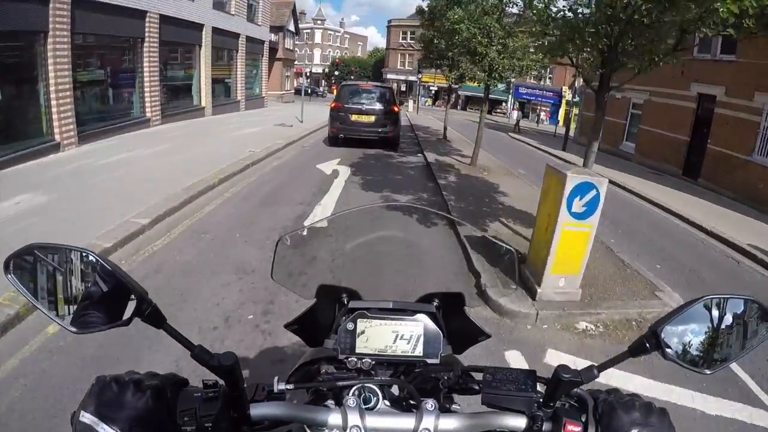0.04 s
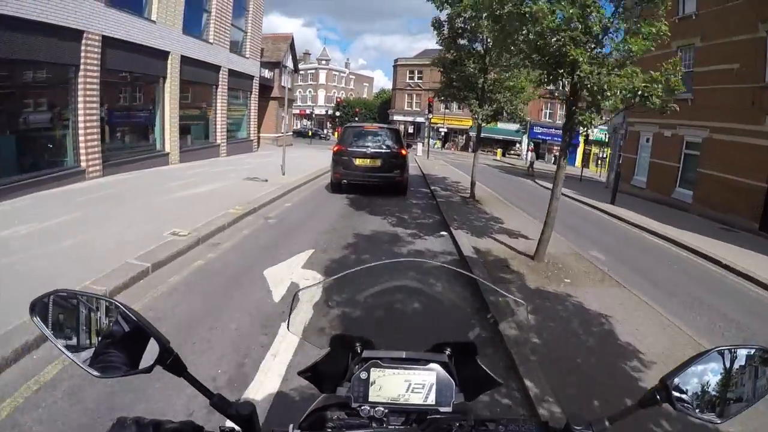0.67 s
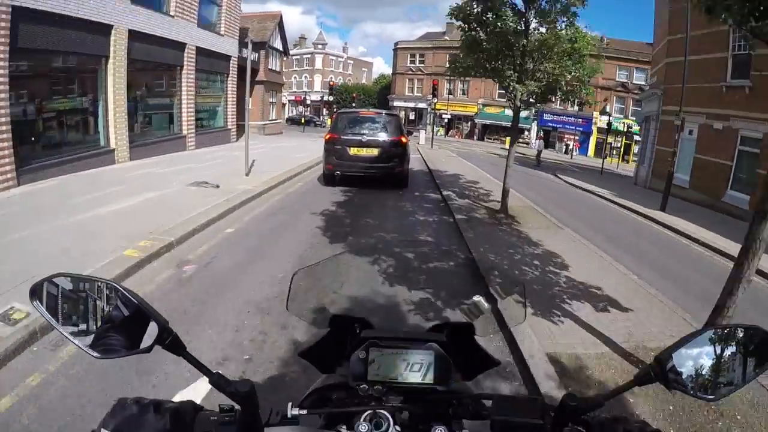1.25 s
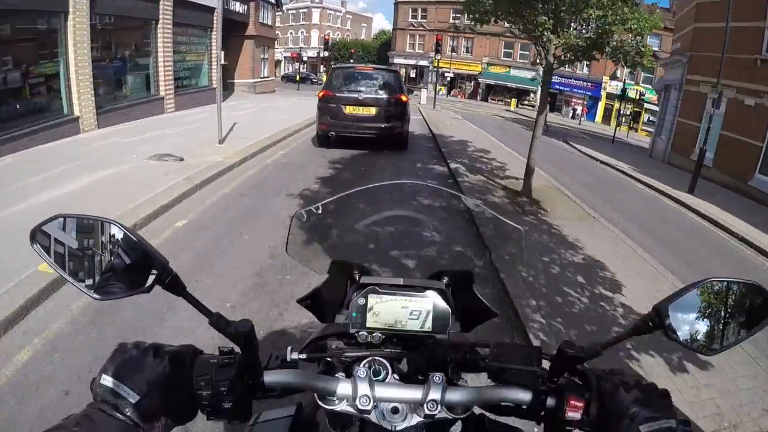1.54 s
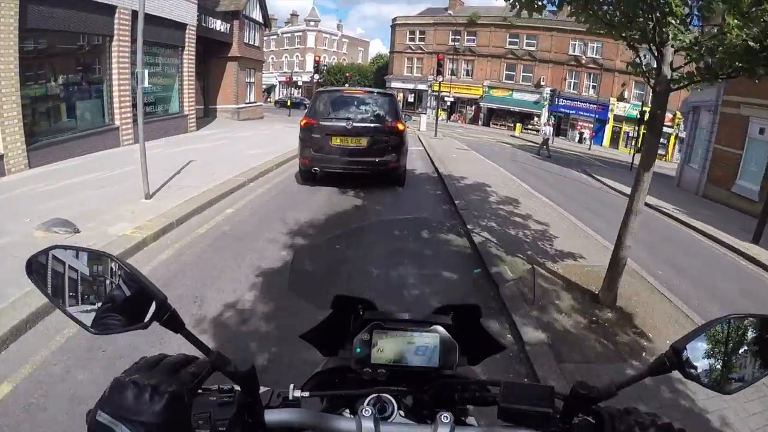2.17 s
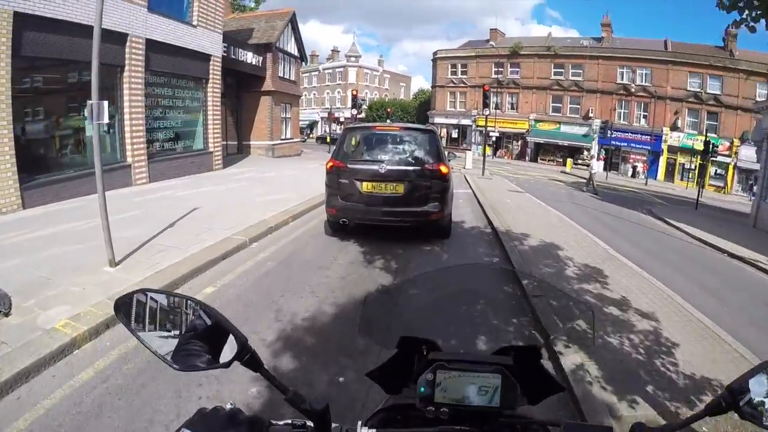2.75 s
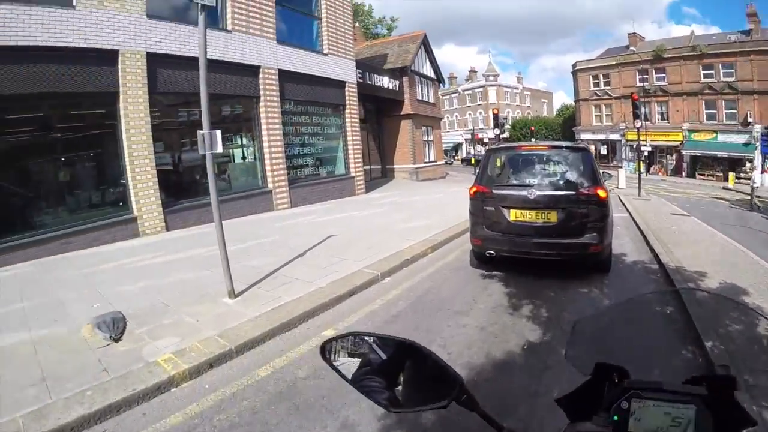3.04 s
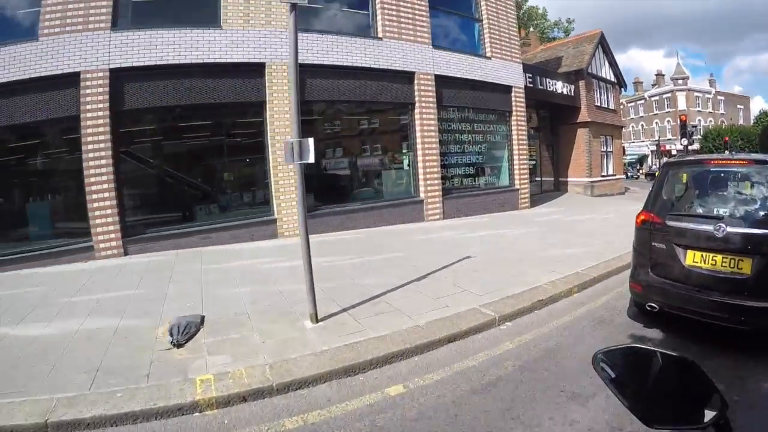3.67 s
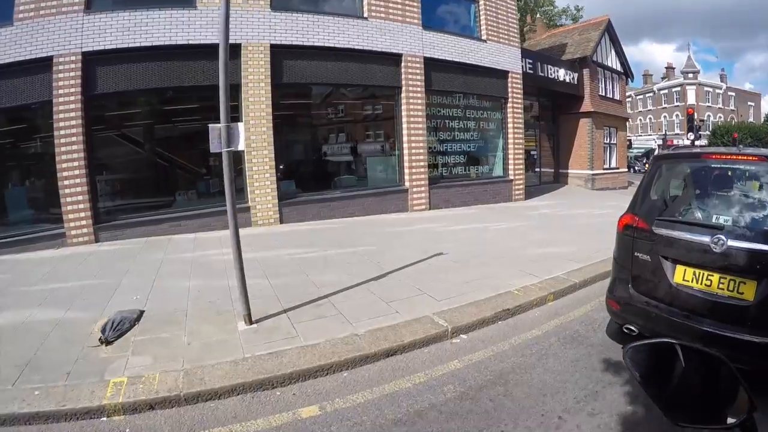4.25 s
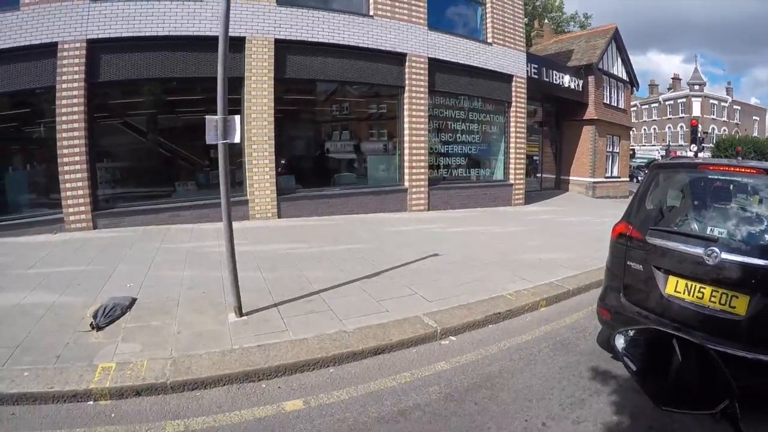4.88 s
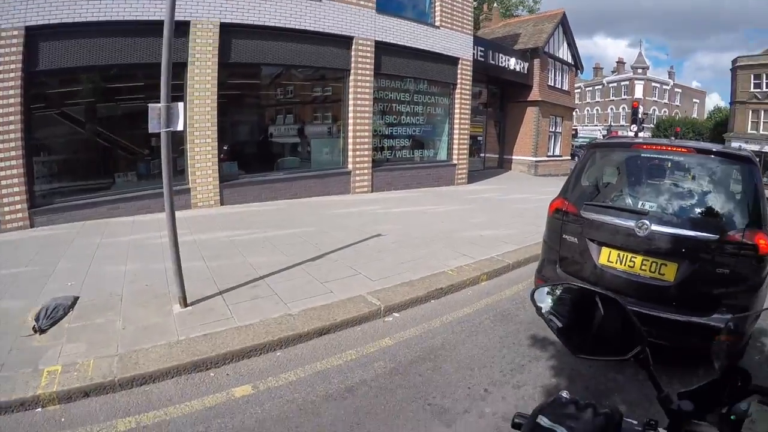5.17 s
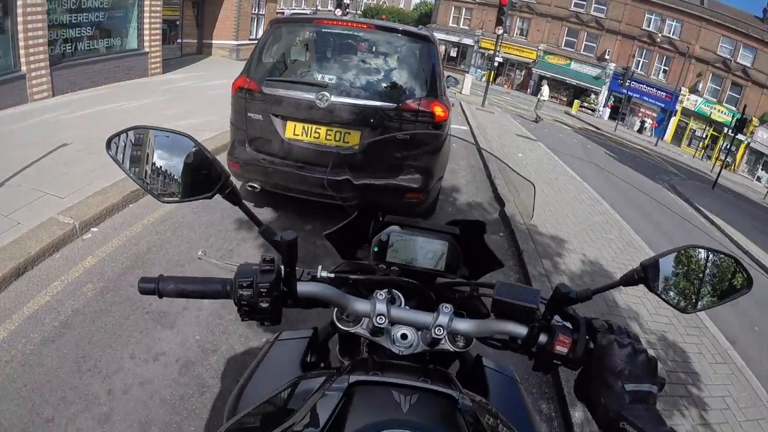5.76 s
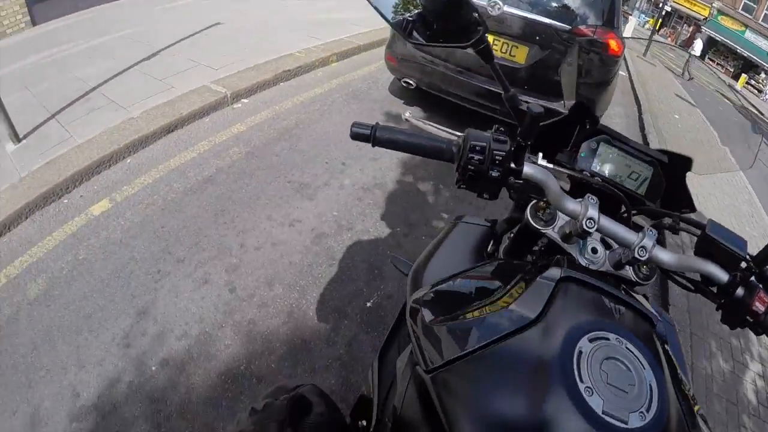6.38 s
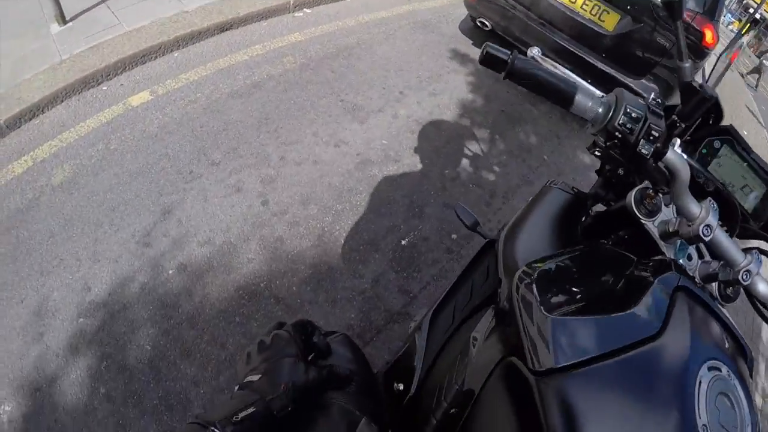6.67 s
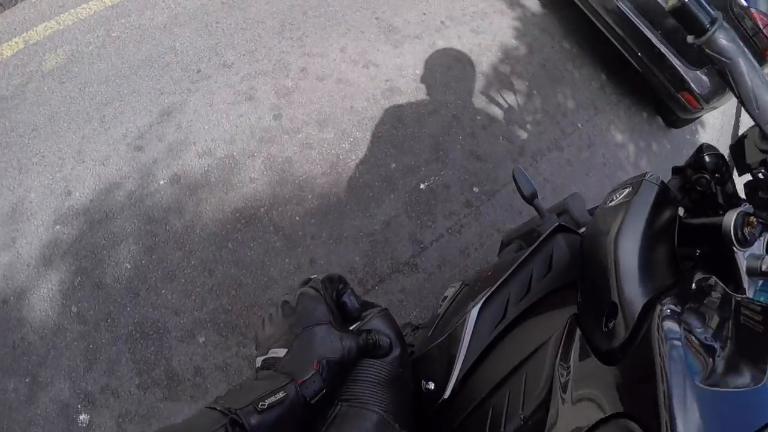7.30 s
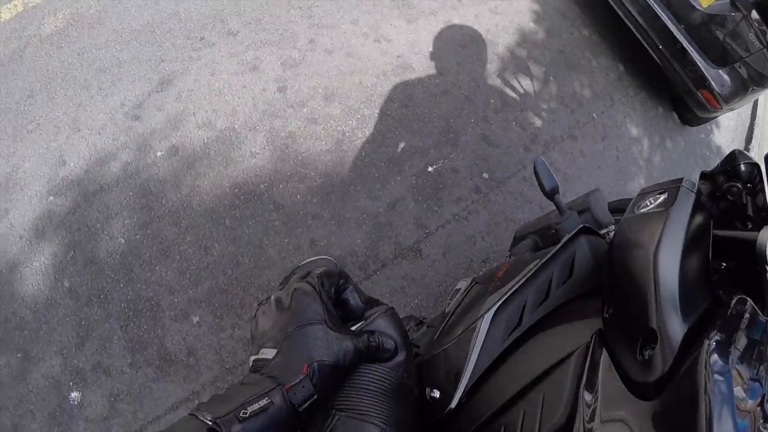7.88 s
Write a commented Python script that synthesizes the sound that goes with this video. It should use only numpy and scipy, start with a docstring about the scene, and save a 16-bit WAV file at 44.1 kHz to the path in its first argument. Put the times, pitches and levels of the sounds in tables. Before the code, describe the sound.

Heard from the rider's helmet, a twin-cylinder motorcycle slows to a steady, throbbing idle, with a few short knocks on the microphone.

```python
"""Motorcycle stopping in town

A 270-degree parallel twin rolls to a stop and idles, heard close up from a stereo camera on the helmet.
Uneven exhaust and intake pulses ring the pipe and airbox; gears clatter and valves tick with the crank.
The balance shifts as the rider pulls the clutch, looks left, looks down and bends over. Wind fades,
a traffic hum beats with the exhaust, clothing rustles and the camera mount knocks a few times."""
import sys
import numpy as np
from scipy import signal
from scipy.fft import rfft, irfft, next_fast_len
from scipy.io import wavfile
from scipy.ndimage import uniform_filter1d, minimum_filter1d

SR = 44100
rng = np.random.default_rng(int(sys.argv[2]) if len(sys.argv) > 2 else 0)


def generate_wav(signal):
    """Clip the signal to [-1, 1] and save it as 16-bit WAV at the path in sys.argv[1]."""
    frames = np.transpose(np.atleast_2d(signal))
    scaled = np.clip(frames, -1, 1) * 32767
    pcm = np.round(scaled).astype(np.int16)
    wavfile.write(sys.argv[1], SR, pcm)


N = 358691
T = np.arange(N) / SR
SIZE = next_fast_len(N)
FREQ = np.maximum(np.arange(SIZE // 2 + 1) * SR / SIZE, 1e-3)
STOP_S = 3.6


def undb(db):
    """Decibels to gain."""
    return 10 ** (np.asarray(db) / 20)


def unit(x):
    """Scale to an rms of one."""
    return x / np.sqrt(np.mean(x ** 2))


def curve(table):
    """A table of times and values, drawn out to one value a sample."""
    return np.interp(T, *np.transpose(table))


def filtered(x, response):
    """Pass a sound through a frequency response."""
    return irfft(rfft(x, SIZE) * response, SIZE)[..., :N]


def resonance(hz, width_hz):
    """Response of one damped mode, gain 1 at its centre."""
    return 1 / (1 + 1j * (FREQ ** 2 - hz ** 2) / (FREQ * width_hz))


def colour(x, spectrum):
    """Give a sound a smooth spectrum and an rms of one."""
    hz, db = np.transpose(spectrum)
    return unit(filtered(x, undb(np.interp(np.log(FREQ), np.log(hz), db, left=-70, right=-70))))


def wander(rate_hz):
    """Smooth random drift with an rms of one."""
    step = int(SR / rate_hz)
    return unit(uniform_filter1d(np.repeat(rng.standard_normal(N // step + 1), step), step)[:N])


def stereo(mid, side, side_db, pan_db):
    """Left and right microphone ports from a shared and an opposed part; positive pan is left."""
    sign = np.array([[1], [-1]])
    return (mid + sign * side * undb(side_db)) * undb(sign * pan_db / 2)


# Crank speed, sinking to a slightly hunting idle: time_s, speed_rpm
ENGINE_SPEED = [(0.0, 1586), (0.28, 1378), (0.6, 1345), (0.86, 1404), (1.44, 1354), (2.58, 1356),
                (2.82, 1386), (3.26, 1323), (3.36, 1357), (5.44, 1354), (5.72, 1332), (6.12, 1364),
                (6.42, 1317), (6.7, 1376), (8.13, 1290)]

def engine_cycles():
    """Running count of four-stroke cycles, one for two turns of the crank."""
    return np.cumsum(curve(ENGINE_SPEED)) / (2 * 60 * SR)


def move(start_s, end_s):
    """Progress of one of the rider's moves, from 0 to 1."""
    return np.interp(T, (start_s, end_s), (0, 1))


def pose():
    """How far the rider looks left, looks down and bends over, carrying the microphone along."""
    down = move(4.85, 6.7)
    left = move(2.74, 3.46) * (1 - down)
    bent = move(6.65, 7.33)
    return left, down, bent


def at_helmet_db(balance, idle_rpm=1355, raised_rpm=1590):
    """A part's level at idle facing ahead, plus what revs, clutch and pose add to it."""
    idle_db, revs_db, in_gear_db, left_db, down_db, bent_db = balance
    revs = (curve(ENGINE_SPEED) - idle_rpm) / (raised_rpm - idle_rpm)
    in_gear = 1 - move(.5, .8)  # the rider pulls the clutch
    left, down, bent = pose()
    return (idle_db + revs * revs_db + in_gear * in_gear_db
            + left * left_db + down * down_db + bent * bent_db)


def strokes(cycle, phase, scatter_db, jitter_s):
    """One pulse a cycle at a crank position, each a little different in size and time."""
    due = np.arange(int(cycle[-1]) + 1) + phase % 1
    chance = rng.standard_normal((len(due), 2))
    at = (np.interp(due, cycle, T, right=np.inf) + jitter_s * chance[:, 0]) * SR
    inside = (at >= 0) & (at < N)
    return np.bincount(at[inside].astype(int), undb(scatter_db * chance[inside, 1]), N)


def boom_swell(peak_s=.521, period_s=.4366):
    """The boom comes and goes while the bike rolls and holds steady once it stands."""
    depth = np.clip(.8 * (1 - T / STOP_S), 0, 1)
    return 1 + depth * np.cos(2 * np.pi * (T - peak_s) / period_s)


# Resonances of the pipe and airbox, below the rider: pitch_hz, width_hz, gain_db, polarity
PIPE_MODES = [(58.2, 33.7, -2, -1), (110.7, 5.8, -2, -1), (152.7, 20.4, 1, -1), (274.8, 18, -13, -1)]
AIRBOX_MODES = [(49.6, 11.4, 3.9, -1), (89.1, 10.4, -8, -1), (163.4, 34.4, 3, 1), (179.3, 8.9, 1.5, -1),
                (232, 5.9, -4, -1)]
# Their thud, boom and bark at the helmet: idle_db, revs_db, in_gear_db, left_db, down_db, bent_db
THUD_BALANCE = (-12.5, -4.5, -1.2, -.5, .1, -1.5)
BOOM_BALANCE = (-21, -11, -1, -0.75, 2.5, 2)
BARK_BALANCE = (-25.5, -13, -2, 1, 0.5, -14)

def exhaust_and_intake(cycle):
    """Two cylinders fire 270 degrees apart; each blows into the pipe, then gulps from the airbox."""
    first, apart, intake_lag = .955, .372, .224  # shares of a cycle
    gas = 0
    for modes, lag in ((PIPE_MODES, 0), (AIRBOX_MODES, intake_lag)):
        pulses = sum(strokes(cycle, first + lag + phase, scatter_db=.75, jitter_s=.00021)
                     for phase in (0, apart))
        cavity = sum(sign * undb(db) * resonance(hz, width) for hz, width, db, sign in modes)
        gas = gas + filtered(pulses, cavity)
    # the silencer damps the top, and small openings radiate little deep bass
    muffle_hz, opening_hz = 300, 45
    high, low = 1j * FREQ / muffle_hz, 1j * FREQ / opening_hz
    radiation = low ** 2 / (low ** 2 + low + 1)
    gas = unit(filtered(gas, radiation / (high ** 2 + np.sqrt(2) * high + 1)))
    boom_band = 1 / (1 + ((FREQ - 180) / 9) ** 4)
    bark_band = (1 - boom_band) / (1 + (200 / FREQ) ** 24)
    thud = filtered(gas, 1 - boom_band - bark_band)
    bark = unit(filtered(gas, bark_band / (1 + (FREQ / 318) ** 12)))
    # the silencer singles out the 16th multiple of the cycle as a firm boom near 180 Hz
    harmonic = np.exp(2j * np.pi * 16 * cycle)
    boom = unit(np.real(harmonic * np.mean(gas / harmonic)))
    return (thud * undb(at_helmet_db(THUD_BALANCE))
            + boom * undb(at_helmet_db(BOOM_BALANCE)) * boom_swell()
            + bark * undb(at_helmet_db(BARK_BALANCE)))


def rattle(cycle, repeat):
    """Dense metal contacts; a share of them comes back on every engine cycle."""
    one_cycle = rng.standard_normal(int(N / cycle[-1]))
    recurring = one_cycle[(cycle % 1 * len(one_cycle)).astype(int)]
    return np.sqrt(repeat) * recurring + np.sqrt(1 - repeat) * rng.standard_normal(N)


# Clatter from the crankcase, down by the rider's feet: frequency_hz, gain_db
GEAR_SPECTRUM = [(200, 13), (340, -1), (430, 1), (530, -11.5), (640, -2), (700, -5.5), (780, 2), (860, -3),
                 (1200, -3.5), (1450, -8.5), (1750, -9), (2400, -48)]
# That clatter at the helmet: idle_db, revs_db, in_gear_db, left_db, down_db, bent_db
GEAR_BALANCE = (-27, 2, 1.5, -1.06, -0.7, 1.05)

def gears(cycle):
    """Primary gears and clutch clatter in the crankcase."""
    grain = undb(1.25 * wander(260) + .5 * wander(35))
    mid, side = (colour(rattle(cycle, repeat=.53) * grain, GEAR_SPECTRUM) for _ in range(2))
    # the side of the case that faces the helmet lends its own pitch
    ahead_hz, left_hz, down_hz = 1287, 880, 1000
    left, down, _ = pose()
    centre_hz = (1 - left - down) * ahead_hz + left * left_hz + down * down_hz
    case = 0
    for hz in (785, 970, 1160):
        facing = np.exp(-(np.log(centre_hz / hz) / .16) ** 2)
        case = case + facing * unit(filtered(mid, resonance(hz, 150)))
    clatter = unit(mid + undb(-10.5) * case)
    return stereo(clatter, side, side_db=-20.5, pan_db=0) * undb(at_helmet_db(GEAR_BALANCE))


# Valves closing: phase_cycles, gain_db
VALVE_TAPS = [(.185, 6), (.54, -10), (0.896, -6.5)]
# Cam chain and high hiss from the cylinder head: frequency_hz, gain_db
CHAIN_SPECTRUM = [(1200, -16), (1650, -6.5), (2000, 4.5), (2300, -5), (2600, -6), (2900, -1), (3080, 0.5),
                  (3260, -4.5), (4400, -13), (5100, -10), (6200, -17), (9000, -33)]
HISS_SPECTRUM = [(2500, 2), (4500, -8), (6100, -4.5), (7500, 0.5), (10000, -2.5), (11300, -6), (12500, -12),
                 (15000, -16)]
# Chain, cover and hiss at the helmet, and the ticks' strength within the hiss:
# idle_db, revs_db, in_gear_db, left_db, down_db, bent_db
CHAIN_BALANCE = (-39.5, 3.5, 2.5, -0.84, -0.4, 0.2)
COVER_BALANCE = (-42.5, 2.5, .5, -4.5, 2, -2.5)
HISS_BALANCE = (-50.5, 2, 1.7, 1.5, -1.5, 0.5)
TICK_BALANCE = (-6.5, -5, 3, 3, -1, 8.5)

def cylinder_head(cycle, fade_s=.0052):
    """The cam chain rustles steadily; closing valves add short bright bursts and ring the cam cover."""
    taps = sum(undb(db) * strokes(cycle, phase, scatter_db=2.5, jitter_s=.00039)
               for phase, db in VALVE_TAPS)
    decays = signal.lfilter([1], [1, -np.exp(-1 / (fade_s * SR))], taps)
    burst = uniform_filter1d(decays, size=60)
    grain = undb(wander(400))
    chain = [colour(rattle(cycle, repeat=.35) * grain * (1 + .34 * burst), CHAIN_SPECTRUM)
             for _ in range(2)]
    # the cover answers each tap with a ping, and hums with the rattle between taps
    ping = unit(filtered(taps, resonance(2204, 130) ** 2))
    hum, hum_side = (unit(filtered(rattle(cycle, repeat=.49), resonance(2149, 320) ** 2))
                     for _ in range(2))
    cover = unit(hum + undb(-3.5) * ping)
    ticking = 1 + undb(at_helmet_db(TICK_BALANCE)) * burst
    hiss = [colour(rng.standard_normal(N) * grain * ticking, HISS_SPECTRUM) for _ in range(2)]
    return (stereo(*chain, side_db=-8.5, pan_db=.8) * undb(at_helmet_db(CHAIN_BALANCE))
            + stereo(cover, hum_side, side_db=-26, pan_db=2.5) * undb(at_helmet_db(COVER_BALANCE))
            + stereo(*hiss, side_db=-1, pan_db=-1) * undb(at_helmet_db(HISS_BALANCE)))


# Low buffeting right at the microphone: frequency_hz, gain_db
WIND_SPECTRUM = [(8, -13), (27, -3), (55, -1), (120, -11), (300, -21), (1000, -61)]
# The buffeting dying away as the bike slows: time_s, level_db
WIND_FADE = [(0, -15.5), (.9, -26.5), (1.6, -29.5), (8, -38)]

def wind():
    """Wind buffets the helmet while the bike rolls, then only the low rumble of the street is left."""
    mid, side = (colour(rng.standard_normal(N), WIND_SPECTRUM) for _ in range(2))
    gusts_db = 1.9 * wander(3.97)
    return stereo(mid, side, side_db=-24.5, pan_db=-1) * undb(curve(WIND_FADE) + gusts_db)


def traffic_hum(pitch_hz=175.76, near_db=-27):
    """Waiting traffic hums, louder as the bike draws up, close enough in pitch to beat with the boom."""
    nearness = np.interp(T, [0, STOP_S], [.4, 1])
    hum = unit(np.sin(2 * np.pi * pitch_hz * T + 1.2 * wander(5.3)))
    return hum * undb(near_db) * nearness


# Jacket and straps, just below the microphone:
# peak_s, length_s, centre_hz, width_hz, level_db, pan_db
CLOTHING_RUSTLES = [(.175, 0.014, 11700, 1500, -55, -1), (0.508, 0.094, 8850, 4000, -47, -3),
                    (5.11, .05, 11400, 1200, -50, -7), (5.245, 0.074, 11100, 1200, -48, -8),
                    (5.453, 0.0034, 10000, 6000, -44, -3), (5.477, .04, 7950, 1600, -44, -5),
                    (6.46, .004, 13000, 3000, -46, 1), (6.554, 0.0044, 14000, 2000, -41, -6.5)]

def clothing():
    """Stiff fabric gives brief swishes and ticks."""
    out = np.zeros((2, N))
    cloth = rng.standard_normal((2, N))
    for peak_s, length_s, hz, width, db, pan_db in CLOTHING_RUSTLES:
        swell = np.exp(-2 * ((T - peak_s) / length_s) ** 2)
        swish = filtered(cloth, resonance(hz, width) ** 2)
        out += undb(db) * swell * unit(stereo(*swish, side_db=4.5, pan_db=pan_db))
    return out


# Resonances of the camera mount: pitch_hz, width_hz, gain_db
MOUNT_MODES = [(264, 30, 17), (396, 29, 14), (590, 230, 1.5), (1030, 280, 7.5), (1350, 220, -10),
               (2110, 850, -5), (2890, 170, 0), (3790, 700, -8), (4870, 530, -8), (7700, 2500, -2)]
# Knocks on the mount, ahead of the camera's limiter: start_s, peak_db, cutoff_hz
MOUNT_KNOCKS = [(3.0664, -6.5, 1680), (5.3583, -6, 1400), (7.5072, -11, 1720), (7.5871, 4.5, 4540)]

def mount_knocks(chatter_s=.0043):
    """Short blows ring the plastic camera mount; harder contacts reach the upper modes."""
    out = np.zeros((2, N))
    mount = sum(undb(db) * resonance(hz, width) for hz, width, db in MOUNT_MODES)
    for start_s, peak_db, cutoff_hz in MOUNT_KNOCKS:
        age = T - start_s
        # one blow, followed by a brief chatter of the joint
        chatter = stereo(*rng.standard_normal((2, N)), side_db=-12, pan_db=-9.5)
        force = (age >= 0) * np.exp(-np.abs(age) / chatter_s) * chatter * .056
        force[:, int(start_s * SR)] -= 1
        ring = filtered(force, mount / (1 + 1j * FREQ / cutoff_hz) ** 2)
        out += undb(peak_db) * ring / np.abs(ring).max()
    return out


def scene():
    """The crank drives every engine layer; wind, traffic and the rider's kit add the rest."""
    cycle = engine_cycles()
    engine = exhaust_and_intake(cycle) + gears(cycle) + cylinder_head(cycle)
    return engine + wind() + traffic_hum() + mount_knocks() + clothing()


def record(dry):
    """Sound reaches the right port a moment later; the camera limits the peaks and cuts the top."""
    port_lag_s, ceiling, top_hz = 5.6e-5, .86, 15500
    ports = np.array([dry[0], filtered(dry[1], np.exp(-2j * np.pi * FREQ * port_lag_s))])
    safe_gain = np.minimum(1, ceiling / (np.abs(ports).max(axis=0) + 1e-9))
    gain = uniform_filter1d(minimum_filter1d(safe_gain, size=300), size=300)
    lowpass = signal.ellip(8, .2, 70, top_hz, fs=SR, output="sos")
    return signal.sosfilt(lowpass, ports * gain)


dry = scene()
out = record(dry)
generate_wav(out)
```